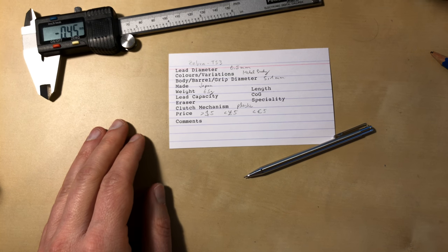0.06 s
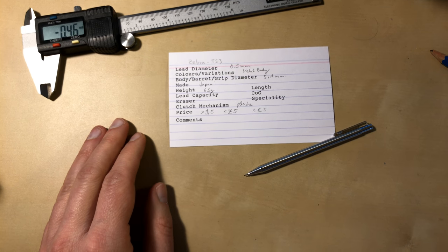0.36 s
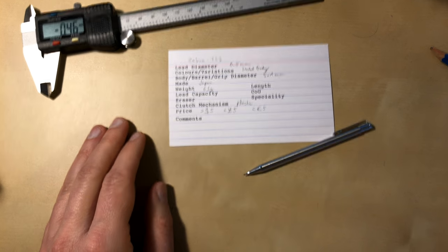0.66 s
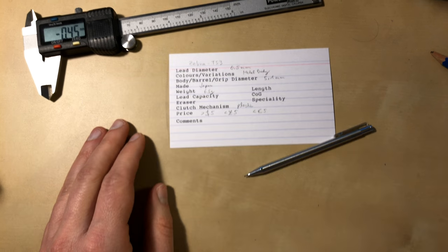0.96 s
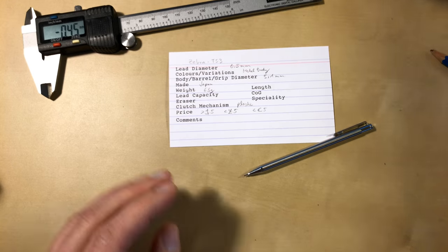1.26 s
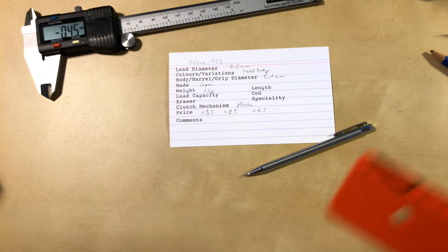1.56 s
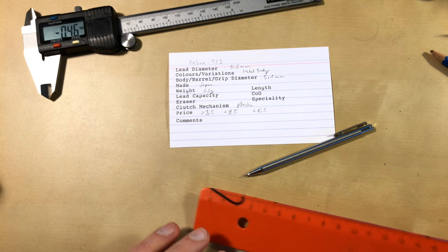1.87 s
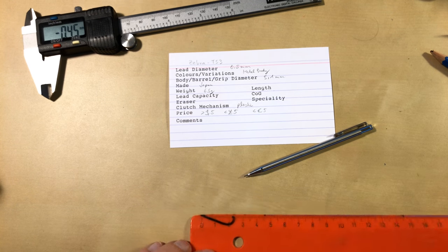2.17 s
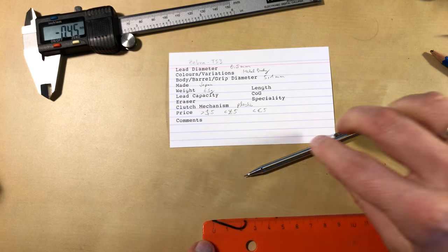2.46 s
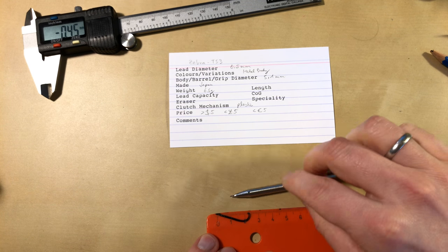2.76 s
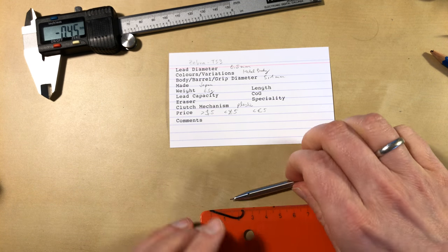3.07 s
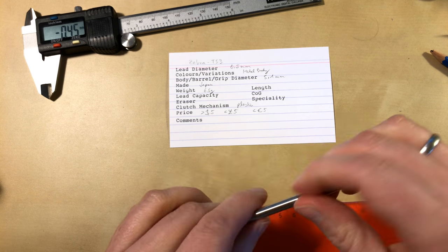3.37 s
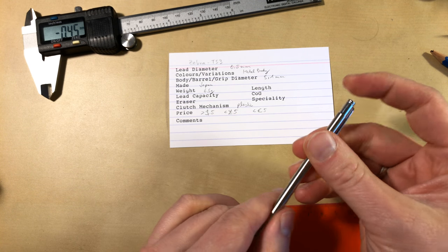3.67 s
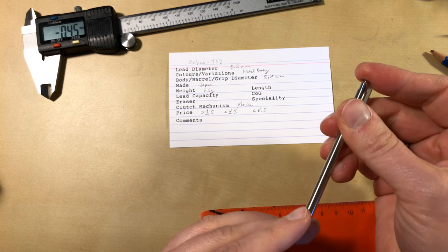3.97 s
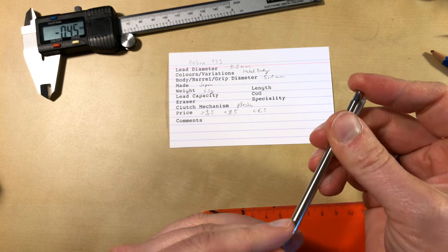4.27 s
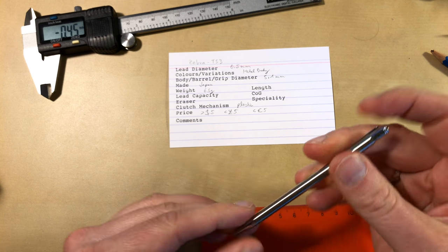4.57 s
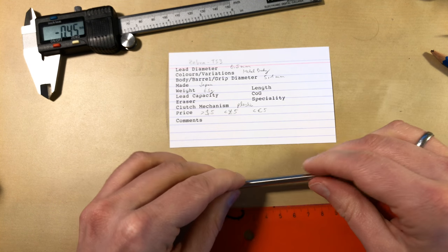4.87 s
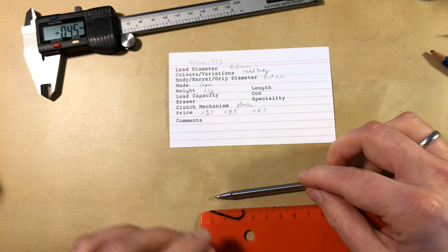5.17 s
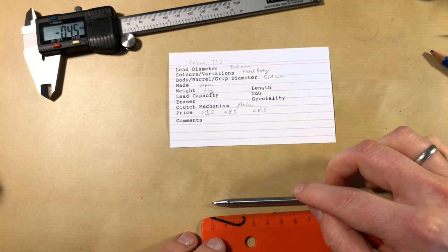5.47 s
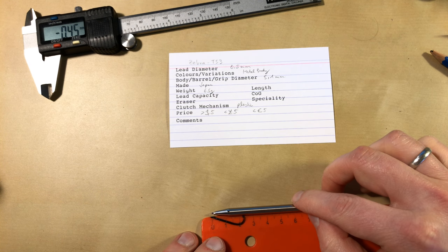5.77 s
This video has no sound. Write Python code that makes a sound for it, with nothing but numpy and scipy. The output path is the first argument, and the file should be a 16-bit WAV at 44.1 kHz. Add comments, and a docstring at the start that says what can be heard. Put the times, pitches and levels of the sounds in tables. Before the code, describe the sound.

Fingers rub and bump the microphone, then a plastic ruler slaps onto a wooden desk and a metal pencil scrapes and knocks.

```python
"""Fingers grip and bump a camera on a stand above a wooden desk: its shell clicks, the stand shakes and
the skin rubs and squeaks, then lets go. Near 1.8 s a plastic ruler is picked up with a hollow ring and
slapped flat. From 2.6 s a metal pencil is dragged off the desk and ticks as it turns in the fingers.
At 5 s it is put down with a knock and pushed up against the ruler.
The small room hums faintly all the way through."""
import sys
import numpy as np
from scipy import signal
from scipy.fft import rfft, irfft, next_fast_len
from scipy.io import wavfile
from scipy.ndimage import uniform_filter1d

SR = 44100
rng = np.random.default_rng(int(sys.argv[2]) if len(sys.argv) > 2 else 0)


def to_wav(sig):
    """Store sig (one row per channel, or 1-D mono) as 16-bit WAV at the path in sys.argv[1].

    Samples outside -1..1 are clipped; the rate is SR.
    """
    pcm = np.clip(np.atleast_2d(sig), -1, 1) * 32767
    pcm = np.round(pcm).astype(np.int16)
    wavfile.write(sys.argv[1], SR, pcm.T)  # frames by channels


N = 264864
TIME = np.arange(N) / SR
SLOW_TIME = TIME[::32]   # enough for things that change slowly
HIT_SAMPLES = 2 ** 14
AGE = np.arange(HIT_SAMPLES) / SR   # seconds since a hit

# The notes the desk top rings with (a fade is a fall of 60 dB): pitch_hz, level_db, fade_s
DESK_NOTES = [(395.3, -13.5, 0.087), (599, -9.5, 0.063), (778, -13.5, 0.12), (957, -20.5, 0.079),
              (1217, -12.5, 0.033), (1750, -13, 0.051), (2527, -21, 0.054)]
# The notes the camera's shell rings with: pitch_hz, level_db, fade_s
SHELL_NOTES = [(1280, -13.5, 0.09), (1653, 3.5, 0.015), (2260, -18.5, 0.22)]
# How fast a struck surface goes quiet: pitch_hz, fade_s
SURFACE_FADES = [(200, 0.086), (700, 0.12), (2000, 0.056), (14000, 0.018)]


def ruler():
    """On edge, the plastic rings hollow. Slapped flat, it cracks and thuds into the desk, which damps it."""
    # The ruler's hits: start_s, low_db, mid_db, high_db, top_db, room_db
    hits = [(1.8293, -2.5, -1, -8.5, -11, -6.5), (1.8754, -3.5, -6.5, -15, -19, 1.5),
            (2.067, 2.5, -11, -27, -33.5, -5), (2.11, 15.5, 16.5, 7.5, 15.5, -10.5),
            (2.1116, 27.5, 6, -9.5, -11.5, -13.5)]
    # The notes of the plastic: pitch_hz, level_db, fade_s
    plastic_notes = [(628, -4.5, 0.053), (928, -7, 0.12), (1532, -4, 0.04)]
    flat_from_s = 2.0
    out = np.zeros((2, N))
    for start_s, *levels, room_db in hits:
        notes = plastic_notes if start_s < flat_from_s else DESK_NOTES
        add(out, start_s, knock(levels, notes, ring_db=-6, contact_s=0.0022, crack_db=4.5,
                                room_db=room_db, bass_db=0.5))
    return out


def pencil():
    """Hard metal gives a very short crack; desk and barrel ring together. In the fingers it only ticks."""
    # The pencil hits desk and ruler: start_s, low_db, mid_db, high_db, top_db, room_db
    hits = [(2.6097, 3, 1.5, -9.5, -4.5, -7), (2.6905, -16, -14, -16, -7.5, -5),
            (2.8595, 2.5, -9, -12, -7.5, -7.5), (5.043, 14, 19, 5.5, -2, -11.5),
            (5.0578, 9, 1.5, -11, -28, -3), (5.1955, 7.5, 0, -19, -15.5, -12),
            (5.609, -3.5, -3.5, -15, -30, -9), (5.6324, 1, 1, -11, -13, -10.5),
            (5.7568, -10, -9.5, -33, -40, -24)]
    # Loose parts tick inside it: start_s, top_db, body_db
    ticks = [(3.2995, -31, -32), (3.5163, -28.5, -27.5), (3.947, -31.5, -27), (3.976, -23.5, -17.5),
             (4.334, -35, -49.5), (4.8441, -28, -25)]
    # The notes of its metal barrel: pitch_hz, level_db, fade_s
    barrel_notes = [(5330, -7.5, 0.04), (9060, -3, 0.0067), (12700, -11, 0.05)]
    out = np.zeros((2, N))
    for start_s, *levels, room_db in hits:
        add(out, start_s, knock(levels, DESK_NOTES + barrel_notes, ring_db=-8, contact_s=0.00093,
                                crack_db=1, room_db=room_db, bass_db=-0.5))
    for start_s, top_db, body_db in ticks:
        levels = [body_db + 2, body_db, top_db - 10.5, top_db]
        add(out, start_s, knock(levels, barrel_notes, ring_db=-17, contact_s=0.0031, crack_db=3.5,
                                room_db=-18, bass_db=-25))
    return out


def camera_clicks():
    """A button on the camera springs back with one hollow, quickly damped tick; then the shell clicks and
    creaks under the fingers."""
    # Clicks and creaks: start_s, low_db, mid_db, high_db, top_db, left_over_right_db, contact_s
    clicks = [(0.2525, 13.5, 1, -7.5, -8.5, 1.5, 0.014), (0.274, 15.5, -10, -12, -18, 0, 0.0081),
              (0.349, -37.5, -15.5, -20.5, -29, 6, 0.0037), (0.388, 8, 2.5, -7, -24, 7, 0.011),
              (0.455, 10.5, -8, -17.5, -16.5, -0.5, .014), (0.6223, 23, 8, 8.5, 1, 3.5, 0.0027),
              (0.662, 15, 3.5, -7.5, -18.5, -0.5, 0.035), (0.892, -7.5, -5.5, -16.5, -31, 14, 0.015)]
    # The small plastic shell goes quiet quickly: pitch_hz, fade_s
    shell_fades = [(1000, 0.059), (14000, 0.032)]
    out = np.zeros((2, N))
    snap = knock([-1, 3, -15.5, -33.5], SHELL_NOTES, ring_db=-0.5, contact_s=0.0017, crack_db=-2,
                 room_db=-2, bass_db=5)
    add(out, start_s=0.1635, sound=snap)
    for start_s, *levels, left_db, contact_s in clicks:
        click = knock(levels, SHELL_NOTES, ring_db=-22.5, contact_s=contact_s, crack_db=-10,
                      room_db=-12, bass_db=4, fades=shell_fades)
        add(out, start_s, click * from_db([[left_db / 2], [-left_db / 2]]))
    return out


def stand_jolts(rise_s=0.0035, reach_octaves=0.87):
    """A push on the stand, or a blow carried through the desk, shakes the microphones, ringing the notes
    nearest its own pitch."""
    # Jolts to the stand (the last, at 2.11 s, is the ruler's slap coming through the desk): start_s, level_db,
    # pitch_hz
    jolts = [(0.119, -13.5, 37.3), (0.254, -15, 124), (0.273, -12, 114), (0.397, -7.5, 41.1),
             (0.458, -20.5, 113), (0.631, -8, 108), (0.653, -3.5, 68.8), (0.906, -27.5, 113),
             (1.293, -31.5, 84), (1.951, -28.5, 86), (2.11, -10, 115)]
    # The stand's low notes: pitch_hz, level_db, fade_s
    stand_notes = [(33.2, 4, 0.2), (56, -2.5, 0.19), (99, -1, 0.093), (124, -5, 0.14), (175.2, 0, .11),
                   (346, -2, 0.14)]
    quarter_turn = np.array([[0], [np.pi / 2]])   # the two sides rock out of step
    out = np.zeros((2, N))
    for start_s, db, jolt_hz in jolts:
        shake = 0
        for hz, note_db, fade_s in stand_notes:
            nearness = np.exp(-0.5 * (np.log2(hz / jolt_hz) / reach_octaves) ** 2)
            tone = np.sin(2 * np.pi * hz * AGE + rng.uniform(0, 2 * np.pi) + quarter_turn)
            rise = 1 - np.exp(-(AGE / (rise_s + 0.19 / hz)) ** 2)
            shake += from_db(note_db) * nearness * tone * rise * fade(fade_s)
        add(out, start_s, from_db(db) * np.sqrt(0.017 * SR) * energy_one(shake))
    return out


def desk_slides():
    """Ruler, pencil and skin slide over the desk, catching and letting go."""
    # Sliding moves: fastest_s, length_s, scuff_db, hiss_db
    moves = [(2.04, 0.08, -53, -48.5), (2.1, 0.11, -42, -47.5), (2.47, 0.22, -56.5, -56.5),
             (2.625, 0.094, -43.5, -55), (2.755, 0.21, -38.5, -44.5), (2.965, 0.16, -44.5, -51),
             (3.05, 0.88, -61, -64), (4.70, 0.34, -68, -63), (5.175, 0.094, -51.5, -68.5),
             (5.28, 0.07, -37, -61), (5.385, 0.078, -45.5, -65), (5.445, 0.31, -45.5, -61),
             (5.553, 0.05, -42, -58.5)]
    # The tone of rubbed wood: pitch_hz, level_db
    colour = [(100, -37), (300, -6.5), (600, -7), (1220, -7.5), (1600, -13), (2900, -20.5), (10500, -22),
              (16000, -30)]
    scuff_db, hiss_db = stroke_levels(moves, rise_share=0.53)
    slide = rubbing(scuff_db, hiss_db, colour, DESK_NOTES, ring_db=-6.5, split_hz=2200,
                    slips_per_s=1500, noise_db=-3.5, dulling=0.13)
    return slide * from_db(2.2 * drift(35))


def pencil_drags():
    """The dragged pencil's scrape sinks in pitch as it slows."""
    # Scrapes: start_s, length_s, start_hz, end_hz, level_db
    drags = [(2.67, 0.19, 1196, 196, -38), (5.545, 0.098, 627, 333, -49)]
    return glides(drags, width_hz=310)


def camera_grip():
    """Fingers rub the camera. In fast strokes the skin sticks and slips, adding rough, wavering tones."""
    # Finger strokes: fastest_s, length_s, scuff_db, hiss_db
    moves = [(0.02, 0.47, -46, -56), (0.268, 0.031, -26.5, -41), (0.42, 0.097, -36.5, -52),
             (0.468, 0.036, -38, -50.5), (0.61, 0.14, -49, -54), (0.86, 0.66, -52, -60),
             (1.1, 0.33, -46.5, -34.5), (1.26, 0.22, -51, -56)]
    # The tone of the rubbed shell: pitch_hz, level_db
    colour = [(250, -7.5), (800, -7), (2100, -4), (3300, -11), (4800, -9), (7500, -17), (11500, -13.5),
              (16000, -22.5)]
    scuff_db, hiss_db = stroke_levels(moves, rise_share=0.74)
    rub = rubbing(scuff_db, hiss_db, colour, SHELL_NOTES, ring_db=-24, split_hz=610,
                  slips_per_s=1300, noise_db=-2, dulling=0.21)
    tones = 0
    for hz in (2050, 3900, 4900):
        roughness = drift(70) / np.sqrt(hz)
        wavering_hz = hz * (1 + 0.06 * drift(8))
        tones += roughness * np.sin(2 * np.pi * np.cumsum(wavering_hz) / SR)
    tones_db = hiss_db - 6 + 0.5 * (hiss_db - hiss_db.max())
    return rub + from_db(tones_db) * rms_one(tones)


def squeaks():
    """Skin on the camera and the ruler's edge give short, thin squeaks."""
    # Squeaks: start_s, length_s, start_hz, end_hz, level_db
    chirps = [(0.76, 0.079, 3800, 4700, -67), (1.06, 0.085, 2104, 2050, -38.5),
              (1.075, 0.058, 2510, 2680, -37.5), (2.03, 0.064, 5310, 5360, -56)]
    return glides(chirps, width_hz=28)


def fingertips():
    """Soft skin lands slowly, so the desk answers with a low thud."""
    # Fingertips land: start_s, level_db
    touches = [(1.347, -2), (3.164, -13), (4.914, -9.5)]
    out = np.zeros((2, N))
    for start_s, db in touches:
        add(out, start_s, knock([db, db - 19, db - 40, db - 48.5], DESK_NOTES, ring_db=-8.5,
                                contact_s=0.011, crack_db=25.5, room_db=3, bass_db=6))
    return out


def stand_sway():
    """The stand sways with a deep rumble while the camera is held, then settles."""
    # How strongly it sways: time_s, level_db
    sway = [(0, -29.5), (.3, -20), (.85, -25), (1.5, -41.5), (2.1, -37.5), (3.2, -56)]
    # The tone of the rumble: pitch_hz, level_db
    colour = [(14, -2), (32, 2), (60, -21.5), (120, -27.5), (3000, -105)]
    return from_db(np.interp(TIME, *np.transpose(sway))) * steady_noise(colour)


def room_air():
    """Steady air noise with a low hum."""
    # The tone of the air: pitch_hz, level_db
    colour = [(30, -4.5), (120, -3), (260, -16), (500, -17), (1000, -26.5), (4000, -35.5), (16000, -40)]
    # The hum: pitch_hz, level_db
    hum_notes = [(264, -67.5)]
    hum = 0
    for hz, db in hum_notes:
        phase = rng.uniform(0, 2 * np.pi, (2, 1))
        hum += from_db(db) * np.sqrt(2) * np.sin(2 * np.pi * hz * TIME + phase)
    return from_db(-57) * steady_noise(colour) + hum


def knock(levels, notes, ring_db, contact_s, crack_db, room_db, bass_db, fades=SURFACE_FADES):
    """A crack as two things meet, the ring of the struck one, one dull nearby echo and the room."""
    # Where the low, mid, high and top levels sit: pitch_hz
    bands_hz = [450, 1450, 4600, 11300]
    # How fast the room goes quiet: pitch_hz, fade_s
    room_fades = [(200, 0.41), (5000, .24), (14000, 0.12)]
    echo_s, echo_db, room_rise_s = 0.02, -15, 0.0011
    burst = rfft(rng.standard_normal(HIT_SAMPLES) * np.exp(-AGE / contact_s))
    even_burst = irfft(burst / np.abs(burst))   # every pitch equally strong
    crack = energy_one(even_burst * np.exp(-AGE / contact_s / 2))
    direct = energy_one(from_db(crack_db) * crack + dying_noise(fades))
    delayed = np.pad(direct, ((0, 0), (int(echo_s * SR), 0)))
    echo = from_db(echo_db) * uniform_filter1d(delayed, size=6)[:, :HIT_SAMPLES]
    room = from_db(room_db) * energy_one(dying_noise(room_fades) * (1 - np.exp(-AGE / room_rise_s)))
    ring = from_db(ring_db) * ringing(notes)
    bass = [(40, levels[0] + 2 * bass_db), (170, levels[0] + bass_db)]
    colour = [*bass, *zip(bands_hz, levels), (17000, levels[-1] - 9)]
    return colour_hit(direct + echo + room + ring, colour)


def ringing(notes, scatter_db=3):
    """Fading tones, struck with new strengths each time; low ones differ most between left and right."""
    out = 0
    for hz, db, fade_s in notes:
        strength = from_db(db + rng.normal(0, scatter_db))
        phase = rng.uniform(0, 2 * np.pi) + np.array([[1], [-1]]) * 250 / hz
        out += strength * energy_one(np.sin(2 * np.pi * hz * AGE + phase) * fade(fade_s))
    return out


def dying_noise(fades):
    """Countless notes blur into noise, each octave fading at its own rate."""
    white, hz = rfft(stereo_noise(HIT_SAMPLES)), np.fft.rfftfreq(HIT_SAMPLES, 1 / SR)
    edges_hz = np.append(0, SR / 2 ** np.arange(7, 0, -1))
    out = 0
    for low, high in zip(edges_hz, edges_hz[1:]):
        band = irfft(white * ((hz >= low) & (hz < high))) * fade(at_hz(fades, (low + high) / 2))
        out += energy_one(band) * np.sqrt(2 * (high - low) / SR)
    return out


def rubbing(scuff_db, hiss_db, colour, notes, ring_db, split_hz, slips_per_s, noise_db, dulling):
    """Tiny, uneven slips shake the rubbed thing: a dull scuff below split_hz, a hiss above."""
    sizes = from_db(3 * np.minimum(rng.exponential(1, N), 4)) * rng.choice([-1, 1], N)
    slips = rms_one(sizes * (rng.random(N) < slips_per_s / SR))
    one_slip = dying_noise(SURFACE_FADES) + from_db(ring_db) * ringing(notes)
    one_slip[:, 0] += 1   # the slip itself comes before the ring
    grain = rms_one(signal.fftconvolve(slips[None], one_slip, axes=1)[:, :N])
    noise = from_db(noise_db) * stereo_noise(next_fast_len(N))[:, :N]
    friction = colour_long(grain + noise, colour)
    scuff = rms_one(signal.sosfilt(signal.butter(3, split_hz, "low", fs=SR, output="sos"), friction))
    hiss = rms_one(signal.sosfilt(signal.butter(3, split_hz, "high", fs=SR, output="sos"), friction))
    # a slow stroke loses its treble
    dull = signal.sosfiltfilt(signal.butter(2, 6000, fs=SR, output="sos"), hiss)
    hiss = dull + (hiss - dull) * from_db(dulling * (hiss_db - hiss_db.max()))
    return from_db(scuff_db) * scuff + from_db(hiss_db) * hiss


def stroke_levels(moves, rise_share, end_db=-19):
    """Scuff and hiss levels in dB: each stroke speeds up for rise_share of its length, then slows."""
    fastest_s, length_s, scuff_db, hiss_db = np.transpose(moves)[:, :, None]
    offset = (SLOW_TIME - fastest_s) / length_s
    away = np.maximum(-offset / rise_share, offset / (1 - rise_share))   # 0 when fastest, 1 at the ends
    levels = []
    for db, flatness in ((scuff_db, 1.4), (hiss_db, 1.7)):
        gains = from_db(db + end_db * np.minimum(away, 4) ** flatness)
        total_db = 10 * np.log10(np.sum(gains ** 2, axis=0) + 1e-14)
        levels.append(np.interp(TIME, SLOW_TIME, total_db))
    return levels


def glides(rows, width_hz):
    """Rubbing drives a tone that swells, fades and slides: a scrape if broad, a squeak if narrow."""
    narrow = signal.butter(2, width_hz, fs=SR, output="sos")
    out = np.zeros((2, N))
    for start_s, length_s, start_hz, end_hz, db in rows:
        progress = np.linspace(0, 1, int(length_s * SR))
        phase = 2 * np.pi * np.cumsum(start_hz + (end_hz - start_hz) * progress ** 2) / SR
        flutter = signal.sosfilt(narrow, rng.standard_normal((2, HIT_SAMPLES)))[:, -len(progress):]
        tone = rms_one(flutter[0] * np.cos(phase) + flutter[1] * np.sin(phase))
        add(out, start_s, from_db(db) * np.sin(np.pi * progress) * tone)
    return out


def stereo_noise(size):
    """White noise at two microphones, more alike at some pitches than at others."""
    # How alike the two sides are: pitch_hz, likeness (-1 opposite, 1 the same)
    likeness = [(30, -0.2), (200, 0.9), (500, 0.1), (1500, 0.8), (12000, -0.2)]
    mid, side = rfft(rng.standard_normal((2, size)))
    alike = at_hz(likeness, np.fft.rfftfreq(size, 1 / SR))
    return irfft(np.sqrt((1 + alike) / 2) * mid + np.sqrt((1 - alike) / 2) * side * [[1], [-1]], size)


def steady_noise(colour):
    """Noise of a given tone that lasts the whole scene."""
    return rms_one(colour_long(stereo_noise(next_fast_len(N)), colour))


def colour_long(x, colour):
    """Turn each pitch of a long sound up or down."""
    size = next_fast_len(N)
    gains = from_db(at_hz(colour, np.fft.rfftfreq(size, 1 / SR)))
    return irfft(rfft(x, size) * gains, size)[..., :N]


def colour_hit(x, colour):
    """Shape the tone of a hit so that nothing rings before the blow (a minimum-phase filter)."""
    gains = from_db(at_hz(colour, np.fft.rfftfreq(HIT_SAMPLES, 1 / SR)))
    cepstrum = irfft(np.log(gains))
    cepstrum[1:HIT_SAMPLES // 2] *= 2
    cepstrum[HIT_SAMPLES // 2 + 1:] = 0
    response = irfft(np.exp(rfft(cepstrum)))
    return irfft(rfft(x, 2 * HIT_SAMPLES) * rfft(response, 2 * HIT_SAMPLES))[..., :HIT_SAMPLES]


def drift(hz):
    """A smooth random wobble, about 1 in size."""
    smooth = signal.butter(3, hz, fs=1 / SLOW_TIME[1], output="sos")
    wobble = signal.sosfilt(smooth, rng.standard_normal(len(SLOW_TIME)))
    return np.interp(TIME, SLOW_TIME, rms_one(wobble))


def fade(fade_s):
    """Fall by 60 dB every fade_s seconds."""
    return from_db(-60 * AGE / fade_s)


def from_db(db):
    """Turn decibels into a multiplier."""
    return 10 ** (np.asarray(db) / 20)


def rms_one(x):
    """Scale to an average (rms) level of 1."""
    return x / np.sqrt(np.mean(x ** 2) + 1e-20)


def energy_one(x):
    """Scale to an energy of 1 per channel."""
    return rms_one(x) / np.sqrt(x.shape[-1])


def at_hz(points, hz):
    """Read between a table's rows, counting pitch in octaves."""
    pitches_hz, values = np.transpose(points)
    return np.interp(np.log(np.maximum(hz, 1)), np.log(pitches_hz), values)


def add(out, start_s, sound):
    """Mix a sound in at start_s."""
    i = int(round(start_s * SR))
    out[:, i:i + sound.shape[-1]] += sound[..., :N - i]


def scene():
    """Desk sounds a little to the left, camera handling and room air."""
    slides, grip = desk_slides(), camera_grip()
    desk = (ruler() + pencil() + fingertips() + slides + pencil_drags()) * from_db([[0.4], [-0.4]])
    return desk + grip + squeaks() + camera_clicks() + stand_jolts() + stand_sway() + room_air()


def record(dry):
    """The loudest peaks are clipped and the highest treble is cut."""
    clipped = np.clip(dry, -0.85, 0.85)
    return signal.sosfilt(signal.ellip(10, 0.2, 80, 15800, fs=SR, output="sos"), clipped)


dry = scene()
out = record(dry)
to_wav(out)
```